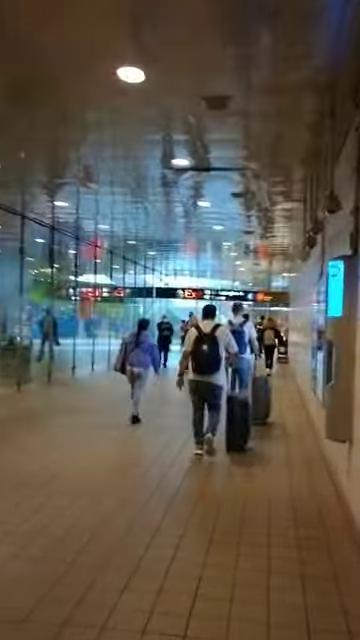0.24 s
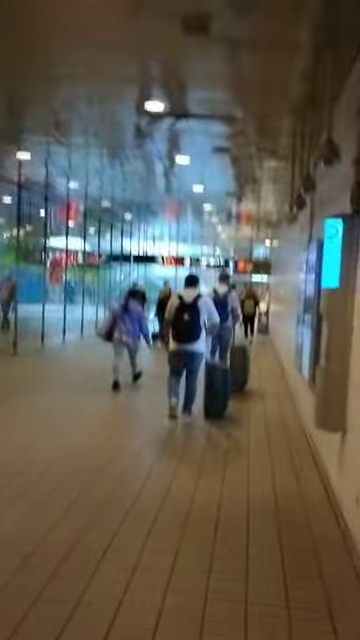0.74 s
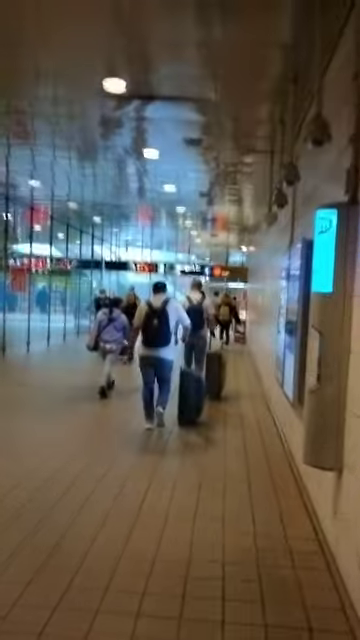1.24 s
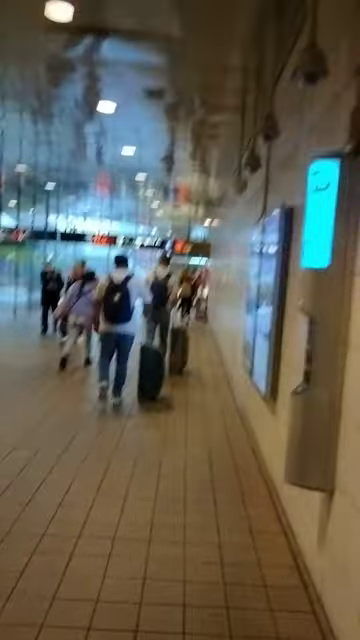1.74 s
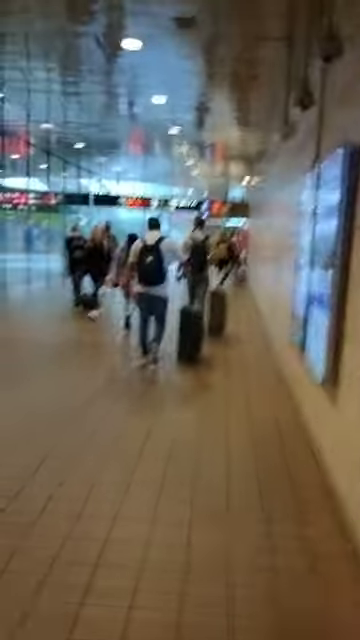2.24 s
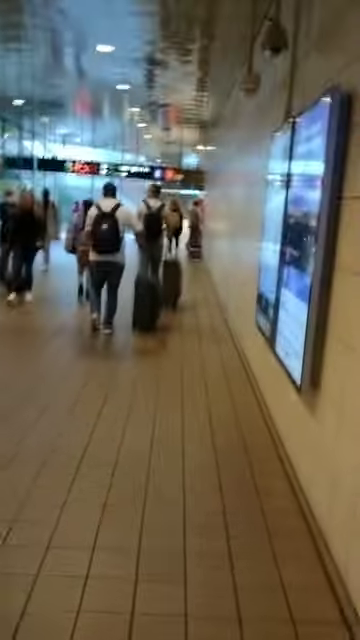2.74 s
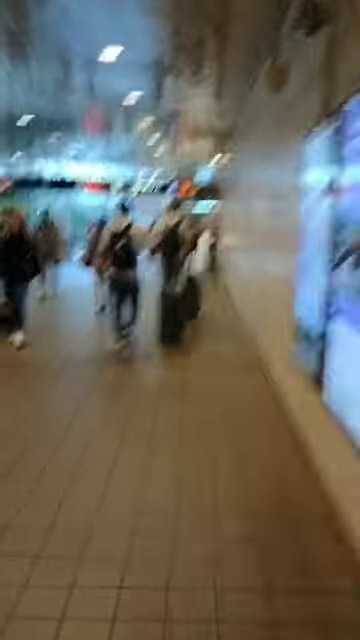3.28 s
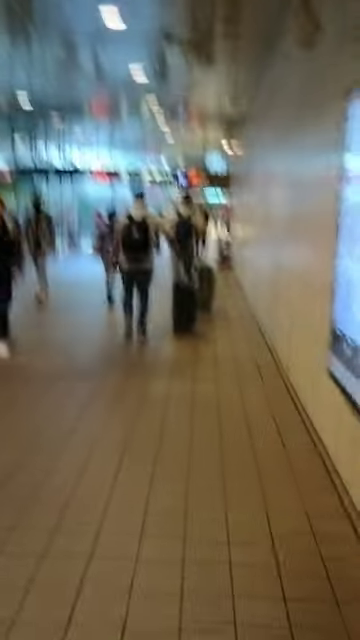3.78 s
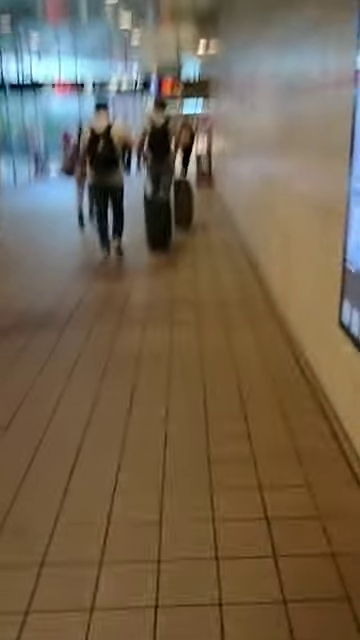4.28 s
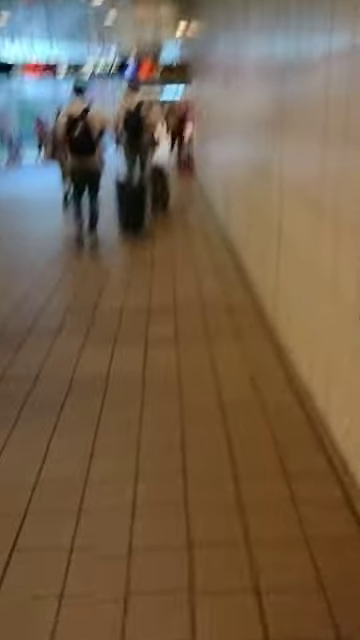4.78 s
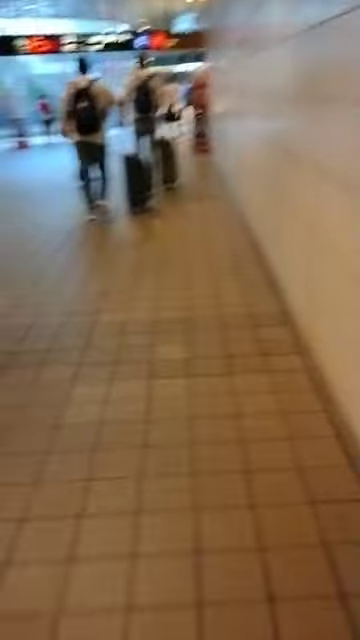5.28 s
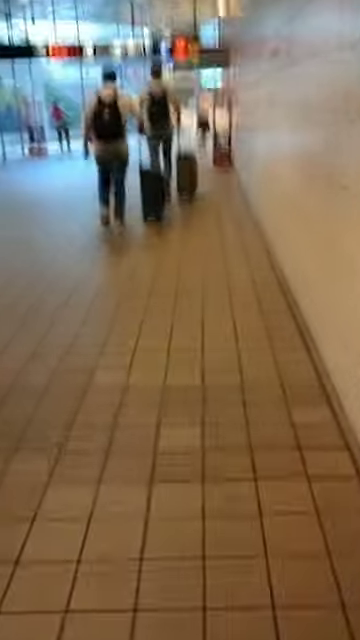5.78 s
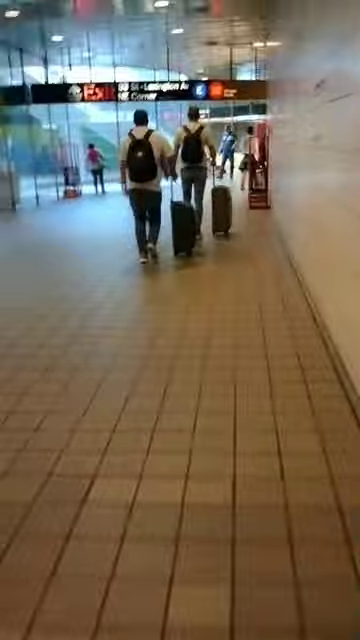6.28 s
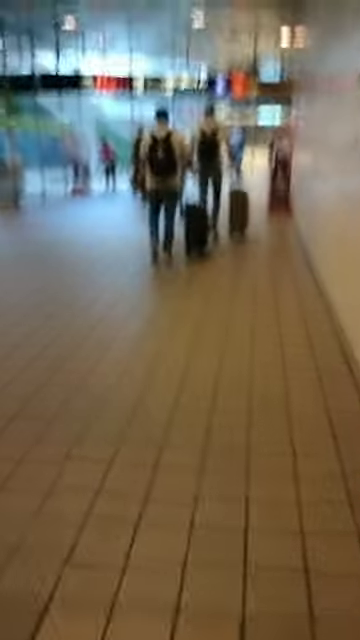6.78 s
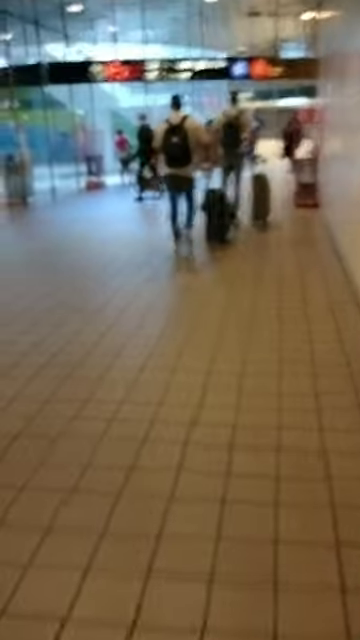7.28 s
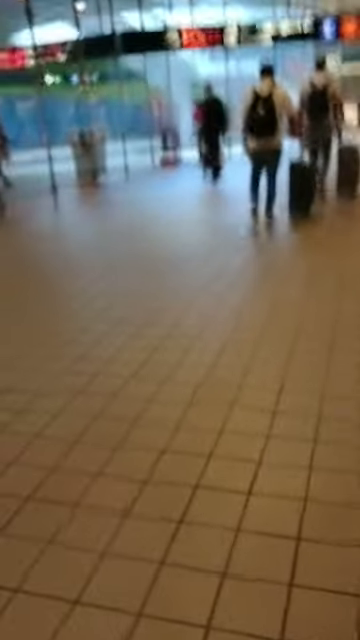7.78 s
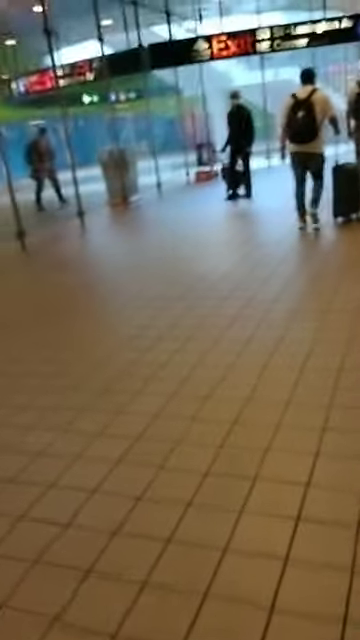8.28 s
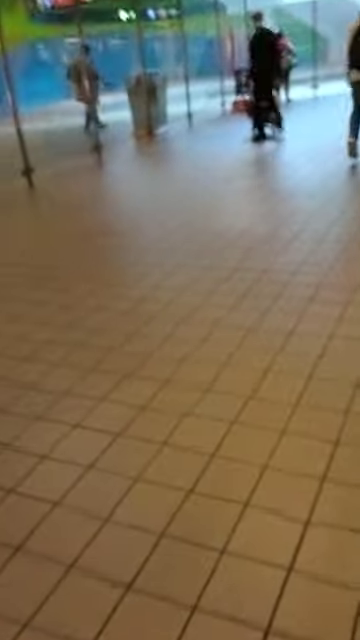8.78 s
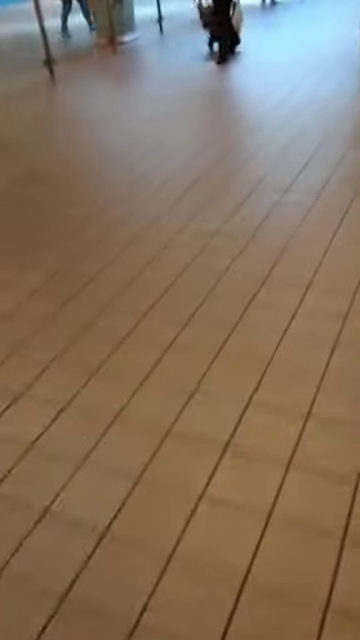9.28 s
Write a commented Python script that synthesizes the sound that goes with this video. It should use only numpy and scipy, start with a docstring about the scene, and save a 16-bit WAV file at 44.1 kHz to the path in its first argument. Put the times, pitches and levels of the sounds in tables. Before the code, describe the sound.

Hard suitcase wheels clack steadily over tile joints, about seven a second, rumbling and rattling louder as they near, then ebbing in an echoing passage.

```python
"""Hard suitcase wheels clack over tile joints, about seven a second, as two cases roll along a passage.
Each joint jolts the hollow shells and loose fittings: impulses and random grains drive filters and resonances.
The rolling grows as a hand-held phone catches up, then ebbs; it drops briefly where the wheels run smoothly.
Left: the cases, the passage's reflections and a ventilation wash, from filtered noise.
Right: throbs, rubbing and bumps of the covering hand, with a little of the left sound leaking in."""
import sys
import numpy as np
from scipy import signal
from scipy.fft import rfft, irfft
from scipy.io import wavfile
from scipy.ndimage import uniform_filter1d

SR = 44100
rng = np.random.default_rng(int(sys.argv[2]) if len(sys.argv) > 2 else 0)


def int16_out(signal):
    """Quantize to a 16-bit WAV file."""
    q = np.round(np.clip(np.atleast_2d(signal).T, -1, 1) * 32767)
    wavfile.write(sys.argv[1], SR, q.astype(np.int16))


N = 420273
TIME = np.arange(N) / SR

# wheel strikes a tile joint: (time [s], level [dB], extra chatter [dB], brightness [dB/octave])
JOINT_STRIKES = [(0.104, -35, -24, 0), (0.2365, -38.5, -5.5, 3), (0.3912, -33.5, -15, -6),
                 (0.537, -37, -4, 2), (0.698, -36.5, -4.5, -1.5), (0.852, -42, -1, -6),
                 (0.997, -39.5, -6.5, 6), (1.1294, -38, 2, 4), (1.279, -38, -0.5, 1), (1.433, -35, -2.5, 3),
                 (1.576, -39.5, -2, 2.5), (1.73, -39, -10, -2), (2.027, -39.5, -6, 7),
                 (2.158, -34, -2.5, -2), (2.299, -51, 11, -1), (2.455, -37, -1, -2), (2.6075, -35, -6, 1),
                 (2.765, -34.5, -13, -2), (2.9257, -30.5, -5.5, 5.5), (3.0729, -29, -9.5, 1),
                 (3.2149, -34.5, -19, 4), (3.3596, -38.5, -0.5, -12), (3.5034, -30.5, 1, 2),
                 (3.6512, -34.5, -5, 0), (3.807, -50.5, 14, 5), (3.9783, -35.5, 2, 5),
                 (4.1338, -28.5, -2, 3.5), (4.275, -29, -2.5, -6.5), (4.447, -27, -10, -4),
                 (4.5934, -24.5, -9.5, -11), (4.725, -32.5, -11, -9.5), (4.881, -40, -12, 2),
                 (5.0387, -25.5, -7, -9), (5.192, -21, -4.5, -2), (5.333, -24, -2, 1), (5.476, -24, -9, -5),
                 (5.62, -25.5, 0.5, -0.5), (5.7645, -21, -9, 1), (5.9332, -33, -9, 8),
                 (6.0782, -30, -6, -8), (6.237, -28.5, -1, 2), (6.3708, -29.5, -8.5, -6),
                 (6.517, -29, -5, -13), (6.669, -27.5, -1.5, -8), (6.8263, -32, -10, 3),
                 (6.9667, -31.5, -6, 3), (7.1558, -33, -11, -1), (7.31, -27.5, -3.5, 14.5),
                 (7.913, -35.5, 0, -10), (8.2392, -35.5, -22, -16), (8.388, -32.5, -1.5, -4),
                 (8.537, -39.5, -9, 5), (8.6884, -38, 0, 4), (8.843, -35.5, -6, 10.5), (9.326, -41, 3.5, 7),
                 (9.4845, -45, 7, 13)]
# steady rolling, louder as the cases come nearer: (time [s], shell rumble [dB], grit [dB])
ROLLING_LEVELS = [(0, -41.5, -55), (2.2, -42, -53.5), (3.1, -41, -49), (4.2, -38.5, -49.5),
                  (6.098, -33, -44.5), (7.6, -34, -41), (8.3, -34, -43.5), (8.7, -40, -46),
                  (9.5, -38, -51.5)]
# hand shifts on the covered microphone: (time [s], level [dB])
HAND_BUMPS = [(1.206, -41.5), (2.078, -34), (2.113, -34.5), (2.26, -38), (2.545, -40), (2.799, -35.5),
              (3.959, -34), (6.815, -42), (7.461, -26.5), (7.739, -30), (7.76, -21.5), (7.853, -35),
              (8.593, -38.5), (8.904, -41)]


def undb(db):
    """Decibels to gain."""
    return 10 ** (np.asarray(db) / 20)


def unit(x):
    """Scale to rms 1."""
    return x / np.sqrt(np.mean(x ** 2))


def curve(rows):
    """Control joined by straight lines in time."""
    return np.interp(TIME, *np.transpose(rows))


def swell(middle_s, length_s):
    """Flat top of height 1 with sloping sides; length taken at half height."""
    return np.interp(TIME, middle_s + length_s * np.array([-.9, -.1, .1, .9]), [0, 1, 1, 0])


def colour(x, points):
    """Causal minimum-phase filter with the given (Hz, dB) response, built from the cepstrum."""
    size = 2 ** 16
    hz, db = np.transpose(points)
    bin_hz = np.fft.rfftfreq(size, 1 / SR) + .5
    log_gain = np.log(undb(np.interp(np.log(bin_hz), np.log(hz), db)))
    cepstrum = irfft(log_gain, size)
    cepstrum[1:size // 2] *= 2
    cepstrum[size // 2 + 1:] = 0
    response = irfft(np.exp(rfft(cepstrum)), size)
    return signal.fftconvolve(x, response)[:N]


def resonate(x, hz, width_hz):
    """One resonance, gain 1 at its centre."""
    return signal.lfilter(*signal.iirpeak(hz, hz / width_hz, fs=SR), x)


def butterworth(x, order, hz, kind="low"):
    """Causal Butterworth filter."""
    return signal.sosfilt(signal.butter(order, hz, kind, fs=SR, output="sos"), x)


def walk(rate_hz):
    """Smooth random wander, spread near 1."""
    k = int(SR / rate_hz)
    steps = np.repeat(rng.standard_normal(N // k + 1), k)
    return uniform_filter1d(steps, k)[:N] * np.sqrt(1.5)


def grains(rate_hz, spread_db):
    """Tiny impacts of uneven size at random moments; rms 1."""
    moments = rng.random(N) < rate_hz / SR
    signs = rng.choice([-1, 1], N)
    return unit(moments * signs * undb(spread_db * rng.standard_normal(N)))


def blows(times_s, db):
    """One impulse per blow."""
    out = np.zeros(N)
    np.add.at(out, np.clip((times_s * SR).astype(int), 0, N - 1), undb(db))
    return out


def shaking(hits, hold_s, fall_s):
    """Shaking after each blow: held briefly, then dying away exponentially."""
    t = TIME[:SR // 2]
    return signal.fftconvolve(hits, np.exp(-np.maximum(t - hold_s, 0) / fall_s))[:N]


def jolting():
    """Each joint shakes the whole case, the more so the harder the blow; 1 for an average blow."""
    s, db = np.transpose(JOINT_STRIKES)[:2]
    hits = blows(s + 0.0058, 0.1 * (db - np.mean(db)))
    return shaking(hits, hold_s=0.0095, fall_s=0.014)


def rolling_levels():
    """Shell rumble and grit [dB]: both follow nearness, worn patches, smooth stretches and joints."""
    # wheels run smoothly: (middle [s], length [s], shell rumble change [dB], grit change [dB])
    lulls = [(0.52, 0.074, -3, -6), (1.02, 0.095, -5.5, -6), (1.528, 0.036, -35, -8),
             (2.088, 0.053, -5, -4), (2.547, 0.063, -21, -3.5), (3.673, 0.11, -12, -10),
             (6.414, 0.044, -5, -6), (7.15, 0.027, -15, -3.5), (7.924, 0.25, -9.5, -6.5),
             (8.487, 0.063, -17, -4), (8.957, 0.13, -26, -3.5)]
    shell_rough_db, grit_rough_db = 2.3, 1.4  # swing over worn patches
    jolt_shell_db, jolt_grit_db = -5, 1  # relative to the steady rolling
    s, shell_db, grit_db = np.transpose(ROLLING_LEVELS)
    roughness = walk(28)  # shared: worn tile shakes shell and fittings together
    shell_lull, grit_lull = sum(np.outer(changes_db, swell(middle_s, length_s))
                                for middle_s, length_s, *changes_db in lulls)
    jolt_power = jolting() ** 2
    shell = np.interp(TIME, s, shell_db) + shell_rough_db * roughness
    shell = shell + 10 * np.log10(1 + jolt_power * undb(jolt_shell_db) ** 2)
    grit = np.interp(TIME, s, grit_db) + grit_rough_db * roughness
    grit = grit + 10 * np.log10(1 + jolt_power * undb(jolt_grit_db) ** 2)
    return shell + shell_lull, grit + grit_lull


def shells(rumble_db):
    """Rough tiles drum on the hollow cases as coloured grains; harder jolts push and shudder the panels."""
    # hollow shell jolts hard: (time [s], level [dB])
    thuds = [(0.057, -37), (2.464, -41), (3, -36.5), (3.527, -36.5), (4.394, -39), (4.678, -42),
             (4.802, -42), (5.203, -31), (5.615, -27), (5.741, -34.5), (5.993, -31.5), (6.259, -31),
             (7.098, -32), (7.243, -33.5), (7.527, -40), (7.681, -35.5), (8.095, -31), (8.386, -35),
             (8.816, -37.5)]
    # shell response: (frequency [Hz], gain [dB])
    shell_colour = [(30, -2), (90, 2.5), (200, 5), (280, 2.5), (345, -6), (440, -4.5), (700, -10),
                    (1200, -14), (1650, -19), (2300, -19), (5000, -53.5)]
    drumming = unit(colour(grains(rate_hz=450, spread_db=2.0), shell_colour))
    # main panel resonance stands out when the rolling is loud and close
    loudest_db = np.max(np.array(ROLLING_LEVELS)[:, 1])
    panel_db = -8.5 + np.minimum(rumble_db - loudest_db, 0)
    panel = unit(resonate(drumming, 343, 36.0)) * undb(panel_db)
    rolling = (drumming + panel) * undb(rumble_db)
    # weight of the load makes a jolt a slow, dull push
    hits = blows(*np.transpose(thuds))
    push = butterworth(hits, 1, 700)
    flutter = grains(rate_hz=920, spread_db=2.5)
    flutter = unit(resonate(resonate(flutter, 320, 260), 320, 260))
    shudder = shaking(hits, hold_s=0.026, fall_s=0.022) * flutter
    return rolling + undb(48.0) * colour(push, shell_colour) + undb(-2.5) * shudder


def pebbles(grit_db):
    """Chips and crumbs catch a wheel in little runs of knocks, 1 dB above the grit level."""
    catching = undb(8 * np.tanh(walk(22)))
    return unit(grains(rate_hz=170, spread_db=2) * catching) * undb(grit_db + 1)


def fittings(grit_db):
    """Fine grit hisses under the wheels; knocks add rattling bursts and loose parts resonate."""
    # handle and wheel housings rattle loudly: (time [s], level [dB])
    rattles = [(1.878, -44), (3.7, -44.5), (3.988, -43.5), (4.596, -43.5), (5.349, -40), (5.623, -39),
               (5.909, -44), (6.303, -42), (6.718, -47), (7.012, -35.5), (7.297, -45), (7.159, -41),
               (7.577, -36), (7.715, -31.5), (8.014, -38), (8.087, -40), (9.165, -40), (9.442, -43.5)]
    # loose parts that buzz: (frequency [Hz], width [Hz])
    loose_parts = [(1150, 510), (2500, 310), (3480, 690), (4700, 780), (5950, 1100)]
    # fittings response: (frequency [Hz], gain [dB])
    fittings_colour = [(500, 6.5), (1100, -0.5), (1700, 3.5), (2500, -3), (3450, 1.5), (5000, -2.5),
                       (5950, 0), (6800, -7.5), (8300, -16), (12000, -24.5), (15500, -20)]
    buzz_db, buzz_swing_db = 2.5, 2.8
    grit = undb(grit_db)
    knocks = blows(*np.transpose(rattles))
    bursts = shaking(knocks, hold_s=0.019, fall_s=0.037)
    sand = grains(rate_hz=2600, spread_db=2.5) * undb(1.2 * walk(200))
    rattle = (undb(3.5) * grit + undb(0.5) * bursts) * sand + pebbles(grit_db)
    buzz = 0
    for hz, width_hz in loose_parts:
        drive = (grit + undb(-4.5) * bursts) * grains(rate_hz=1100, spread_db=5.0)
        # each part comes and goes by itself
        level_db = buzz_db + buzz_swing_db * (walk(17) + walk(45))
        buzz = buzz + resonate(drive, hz, width_hz) * undb(level_db)
    # thin tick at each rattle, faint cracks of single grains
    ticks = undb(-6) * knocks + undb(-23) * grit * grains(rate_hz=50, spread_db=3)
    return colour(rattle + buzz, fittings_colour) + butterworth(ticks, 1, 5000, "high")


def passage(x):
    """Wall and ceiling reflections, then a tail losing treble first; the pattern shifts as everyone walks."""
    t60_s = 0.73
    t = TIME[:SR]
    out = x
    for shift in (np.cos(2 * TIME), np.sin(2 * TIME), np.cos(np.pi * TIME), np.sin(np.pi * TIME)):
        noise = rng.standard_normal((3, SR))
        early = noise[0] * (t > .008) * np.exp(-t / 0.01)
        dull = butterworth(noise[1], 2, 2500)
        bright = .5 * noise[2] * np.exp(-t / .14)
        late = (dull + bright) * (t > .02) * np.exp(-np.log(1000) * t / t60_s)
        response = (undb(-20.5) * unit(early) + undb(-23.0) * unit(late)) / np.sqrt(SR)
        out = out + signal.fftconvolve(x * shift, response)[:N]
    return out


def hall():
    """Ventilation and far concourse wash: coloured noise with a slow wander in level."""
    # wash response: (frequency [Hz], gain [dB])
    wash_colour = [(25, 2.5), (120, -2), (260, -6), (480, -16), (900, -25.5), (1700, -16.5), (2600, -41.5),
                   (6000, -37.5), (9000, -50), (16000, -55)]
    return unit(colour(rng.standard_normal(N), wash_colour)) * undb(-43.5 + walk(3.9))


def leak(air):
    """A little sound creeps round the hand, scattered by shifting gaps."""
    # response through the hand: (frequency [Hz], gain [dB])
    cover_colour = [(40, -23), (220, -39), (450, -41), (750, -30), (1400, -36), (3000, -29), (6000, -40.5),
                    (15000, -30)]
    t = TIME[:SR // 20]
    out = 0
    for shift in (np.cos(2 * np.pi * TIME), np.sin(2 * np.pi * TIME)):
        scatter = rng.standard_normal(SR // 20) * np.exp(-t / 0.017)
        out = out + signal.oaconvolve(air * shift, unit(scatter) / np.sqrt(len(scatter)))[:N]
    return colour(out, cover_colour)


def hand():
    """The hand pumps air trapped over the port until it saturates; skin sticks, slips and bumps."""
    # restlessness between squeezes: (time [s], level [dB])
    grip = [(0, -29.5), (0.7, -39.5), (2.2, -34), (3.3, -38), (3.7, -25.5), (5.3, -36), (7.9, -30.5),
            (9.3, -51)]
    # hand tightens on the phone: (middle [s], grip change [dB])
    squeezes = [(1.019, 25.5), (1.792, 7.5), (2.15, 8), (2.48, 12), (3.965, -4), (4.91, 15.5),
                (5.781, 11.5), (6.4, 11), (6.84, 11.5), (7.46, 12), (8.482, 15.5), (8.924, 38), (9.512, 28)]
    # trapped air pressure: (frequency [Hz], gain [dB])
    pressure_colour = [(1, -9.5), (4, -4.5), (8, 1), (14, -10), (25, -16.5), (45, -39), (90, -45),
                       (200, -111)]
    # skin rub: (frequency [Hz], gain [dB])
    skin_colour = [(15, 0), (35, 10.5), (80, -8), (130, -11.5), (220, -26), (600, -44), (1500, -55.5),
                   (6000, -89)]
    # bump of the hand: (frequency [Hz], gain [dB])
    thump_colour = [(20, 5), (70, 10.5), (140, 2.5), (260, -8), (600, -25.5), (1000, -48), (2500, -52),
                    (9000, -80)]
    squeeze_s, shove_db, shove_hz = 0.16, 48.5, 34
    grip_db = curve(grip) + sum(db * swell(middle_s, squeeze_s) for middle_s, db in squeezes)
    swing_db = .5 * (grip_db - np.mean(grip_db))
    swing = unit(colour(rng.standard_normal(N), pressure_colour)) * undb(swing_db)
    # each squeeze shoves the trapped air, which swings once or twice
    shoves = blows(np.array(squeezes)[:, 0] - squeeze_s / 10, shove_db)
    shoves = resonate(resonate(shoves, shove_hz, shove_hz), shove_hz, shove_hz)
    throb = 0.49 * np.tanh(0.84 * swing + shoves)
    slips = grains(rate_hz=130, spread_db=2.5) * undb(8 * np.tanh(walk(18)))
    # beyond -25 dB of grip the skin holds fast and rubs no louder
    rub = unit(colour(slips, skin_colour)) * undb(np.minimum(grip_db, -25) + 0.5)
    bumps = undb(55.0) * colour(blows(*np.transpose(HAND_BUMPS)), thump_colour)
    return throb + rub + bumps


def clacks():
    """A wheel scrapes through the joint, its partner may follow; impacts and chatter ring the wheel modes."""
    # second wheel of a pair strikes the same joint: (time [s], level [dB])
    second_wheels = [(3.520, -30), (3.993, -33), (4.005, -31), (4.146, -29), (4.173, -36), (5.057, -37),
                     (5.497, -30), (5.628, -24), (5.779, -25.5), (6.09, -31), (6.248, -27.5),
                     (6.845, -29.5), (6.982, -30), (8.252, -33.5), (8.854, -32)]
    # wheel and fork resonances: (frequency [Hz], width [Hz], gain [dB])
    wheel_modes = [(741, 450, -6), (1083, 450, 0.5), (1337, 210, 4.5), (1560, 370, 4), (1900, 320, 3),
                   (2048, 256, -3)]
    average_chatter_db = -3  # relative to an average blow, before extra chatter
    chatter_share = 0.73  # dB of chatter per dB of blow: hard hits chatter relatively less
    tilt_pivot_hz = 1350  # a brighter blow gains above, loses below
    s, db, extra_db, tilt = np.transpose(JOINT_STRIKES)
    mean_db = np.mean(db)
    chatter_db = average_chatter_db + extra_db + mean_db + chatter_share * (db - mean_db)
    hits = blows(s, db) + blows(*np.transpose(second_wheels))
    # contact lasts a few ms: the rim drops in and climbs the far edge
    pressing = uniform_filter1d(shaking(hits, hold_s=0.002, fall_s=0.0036), SR // 300)
    contact = pressing * rng.standard_normal(N)
    chatter = shaking(blows(s + 0.0047, chatter_db), hold_s=0.018, fall_s=0.032)
    chatter = chatter * grains(rate_hz=1100, spread_db=-0.5)
    force = undb(30.0) * hits + undb(12.0) * contact + undb(9.5) * chatter
    # each blow lands on another spot of the rim: duller or brighter, favouring other modes
    midpoints_s = (s[1:] + s[:-1]) / 2
    tilt_db = tilt[np.searchsorted(midpoints_s, TIME)]
    ring = 0
    for k, (hz, width_hz, mode_db) in enumerate(wheel_modes):
        octaves = np.clip(np.log2(hz / tilt_pivot_hz), -1, .5)
        shade_db = tilt_db * octaves + 2.0 * walk(25)
        ring = ring + (-1) ** k * resonate(force * undb(mode_db + shade_db), hz, width_hz)
    # plastic tread softens the blow
    return butterworth(ring, 2, [450, 3300], "band") * undb(0.5)


def casing():
    """Hard hand bumps knock the phone's casing, short and solid, with a rebound or two after the hardest; both
    microphones feel it."""
    # casing knocks again just after the hardest bump: (time [s], level [dB])
    casing_rebounds = [(7.774, 6), (7.811, 3)]
    # casing resonances: (frequency [Hz], width [Hz], gain [dB])
    casing_modes = [(415, 680, -2.5), (740, 300, 2.5), (990, 290, -4.5)]
    hardest_db, growth = 18, 2.84  # push of the hardest bump; dB of push per dB of bump
    s, db = np.transpose(HAND_BUMPS)
    push = blows(s, hardest_db + growth * (db - np.max(db))) + blows(*np.transpose(casing_rebounds))
    ring = sum((-1) ** k * undb(mode_db) * resonate(push, hz, width_hz)
               for k, (hz, width_hz, mode_db) in enumerate(casing_modes))
    return butterworth(ring, 4, 860)


def handle_tube():
    """A loose metal handle tube jingles after some jolts; two resonances trade weight as it shifts."""
    # handle tube jingles: (time [s], level [dB])
    jingles = [(4.395, -21), (5.08, -30), (5.35, -29), (5.625, -24.5), (6.718, -20), (7.012, -28),
               (7.29, -21)]
    width_hz = 245
    jingle = shaking(blows(*np.transpose(jingles)), hold_s=0.025, fall_s=0.025)
    jingle = jingle * grains(rate_hz=700, spread_db=3)
    side = np.tanh(2 * walk(4)) / 2
    out = 0
    for sign, hz in ((1, 5710), (-1, 6120)):
        out = out + resonate(resonate(jingle * (.5 + sign * side), hz, width_hz), hz, width_hz)
    return out


def scene():
    """Open port on the left, covered one on the right."""
    rumble_db, grit_db = rolling_levels()
    cases = clacks() + fittings(grit_db) + handle_tube() + shells(rumble_db)
    air = passage(cases) + hall()
    return np.array([air, leak(air) + hand()]) + casing()


def record(dry):
    """The phone rounds the largest swings and cuts the top above 15.8 kHz."""
    rounded = dry / (1 + (dry / .8) ** 8) ** (1 / 8)
    return signal.sosfilt(signal.ellip(8, .2, 70, 15800, fs=SR, output="sos"), rounded)


dry = scene()
out = record(dry)
int16_out(out)
```